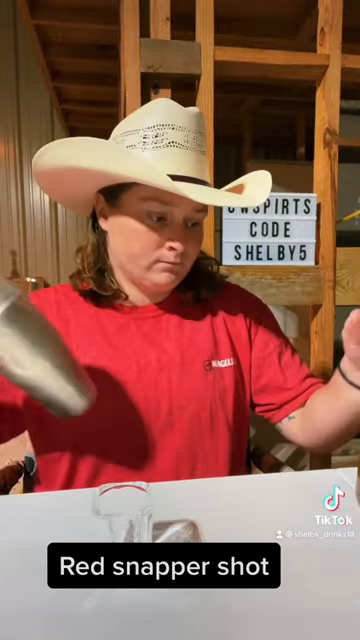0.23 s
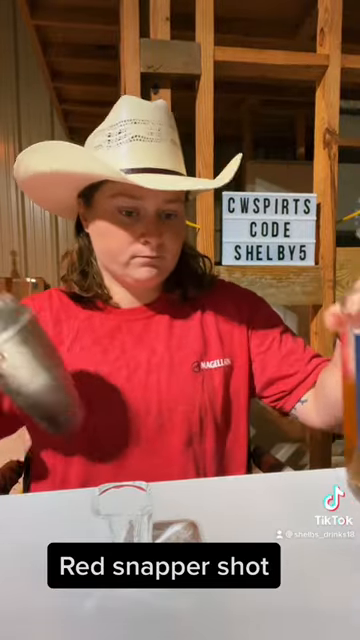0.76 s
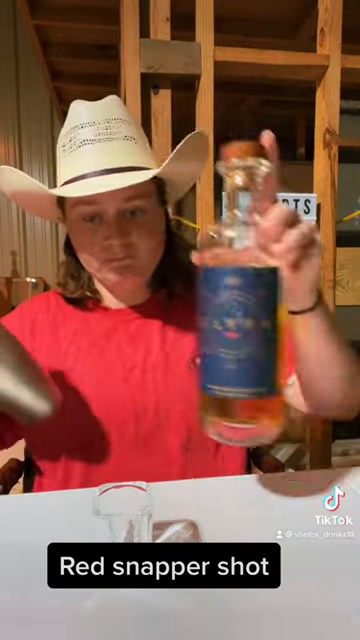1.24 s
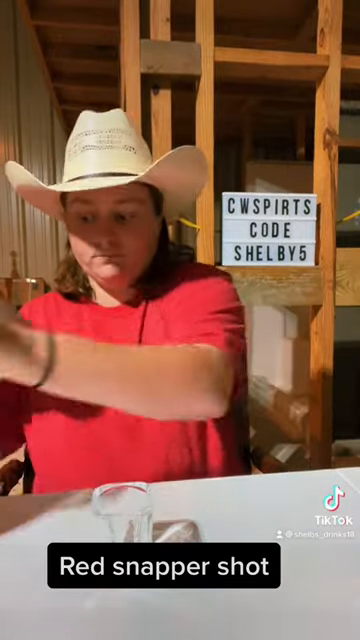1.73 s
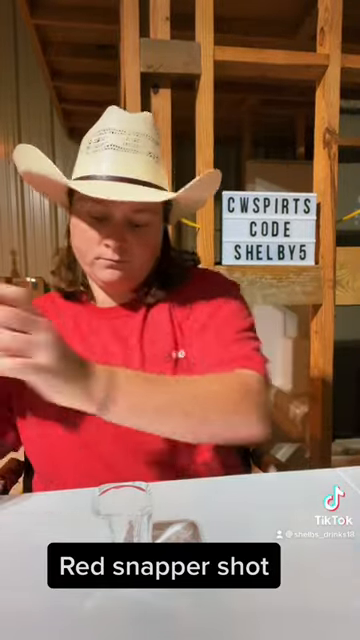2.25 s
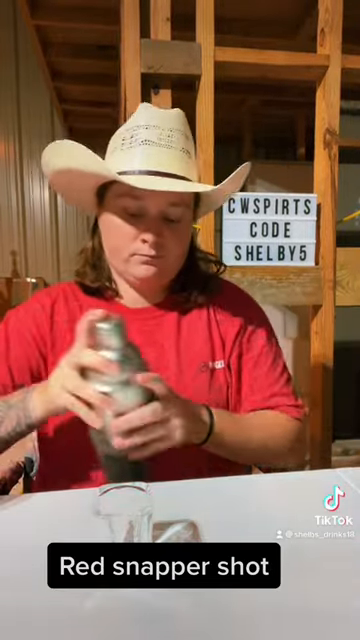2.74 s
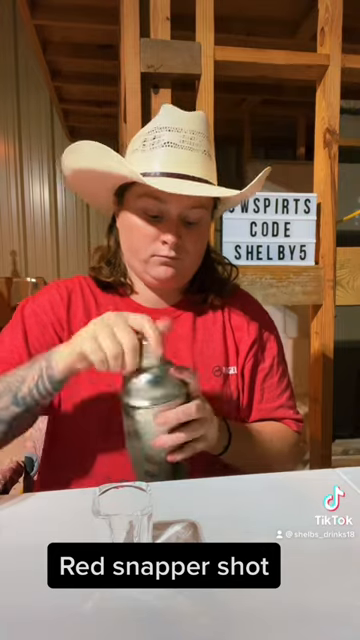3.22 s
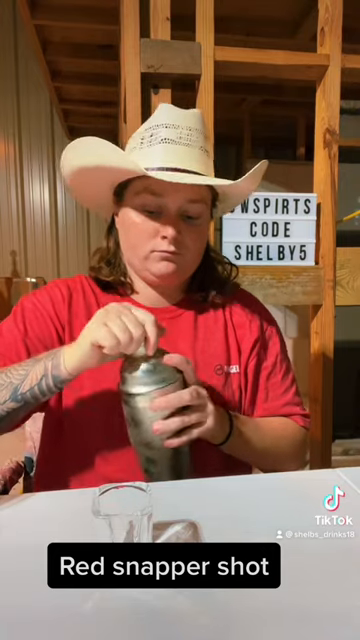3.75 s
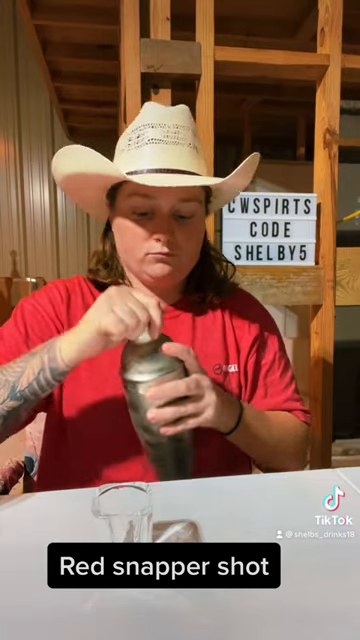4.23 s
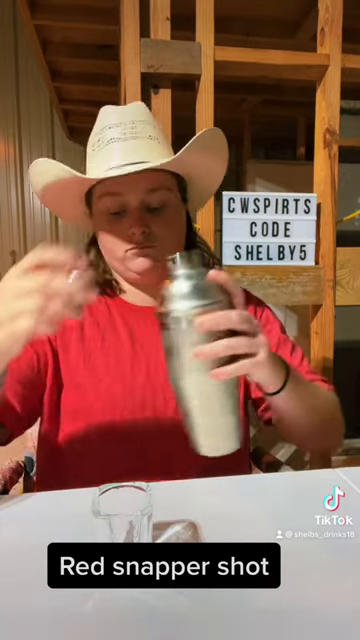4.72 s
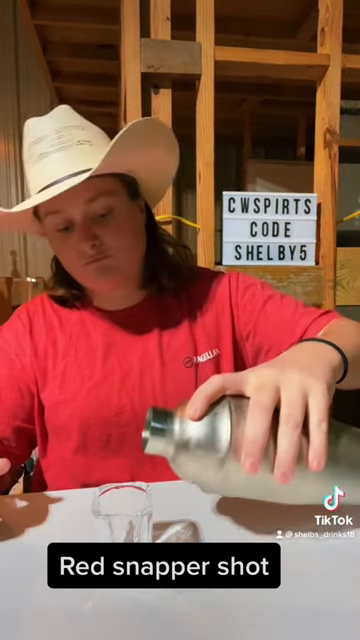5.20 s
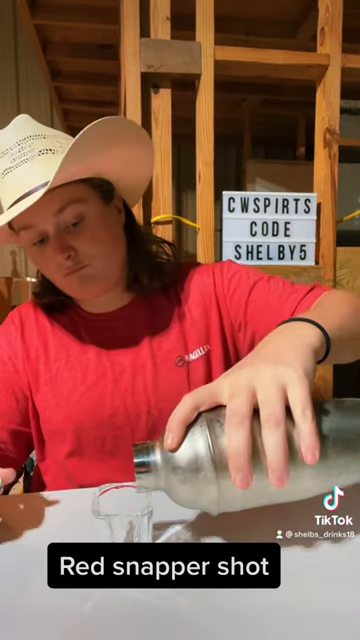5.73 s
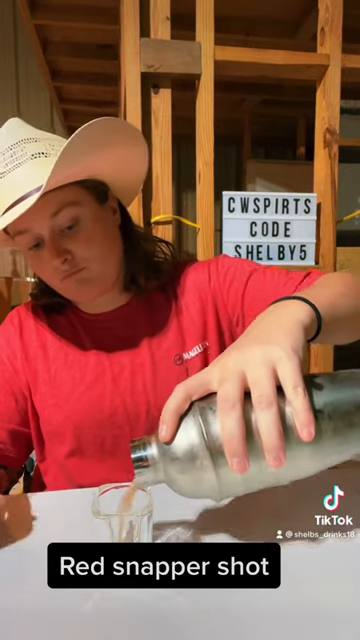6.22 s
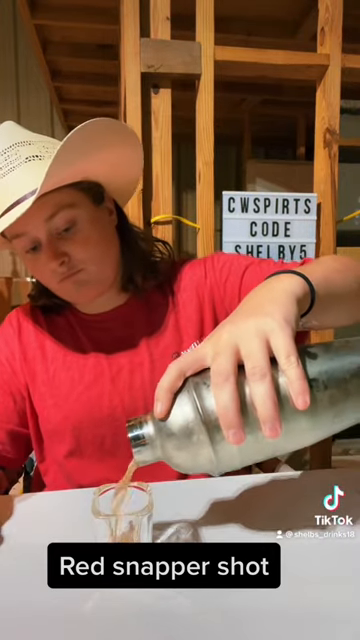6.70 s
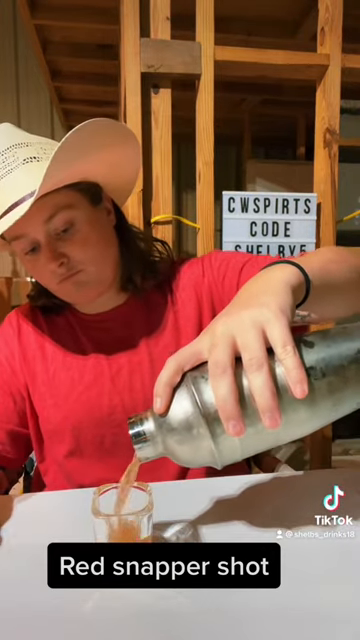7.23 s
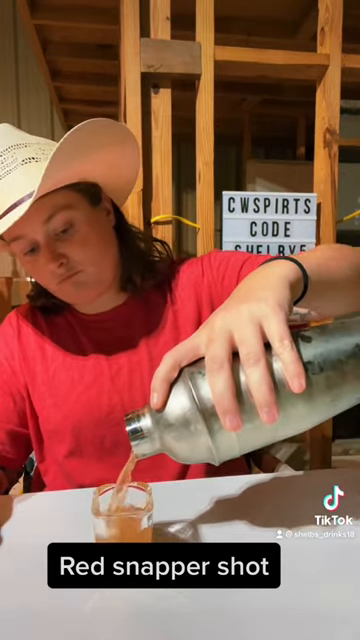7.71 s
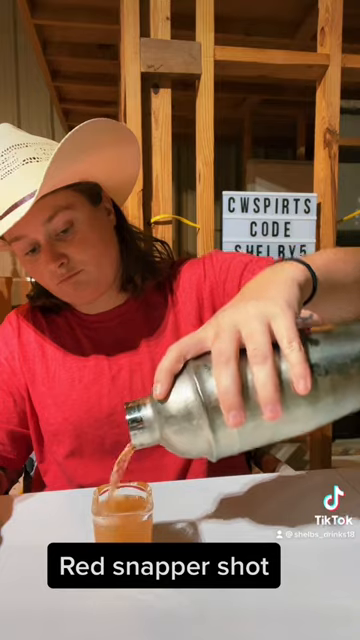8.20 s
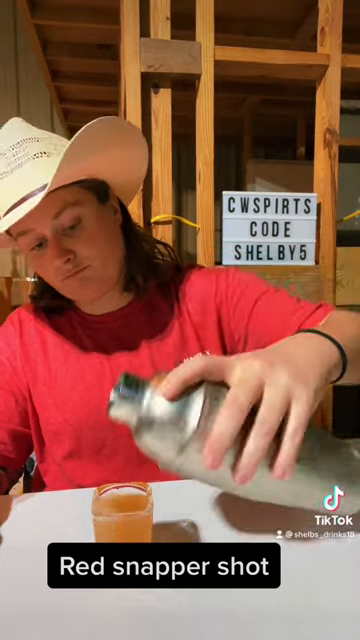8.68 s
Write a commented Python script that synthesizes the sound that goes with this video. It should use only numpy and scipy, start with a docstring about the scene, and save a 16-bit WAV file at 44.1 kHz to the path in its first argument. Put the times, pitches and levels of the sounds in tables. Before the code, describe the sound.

Over a low steady hum, loud metallic ice shaking stops, steel clicks open, drink trickles into a shot glass, and ice slides back.

```python
"""Ice and liquor rattle and slap in a steel shaker over a steady mains hum, in a small wooden room.
A glass bottle is set down with a thump, foam fizzes, and the steel cap is worked off with rubs and clicks.
The shaker tips, a thin stream gurgles into a shot glass, and the ice slides back as it is righted.
Hits and rubs are mostly filtered noise; bubbles and small chips are many short fading tones.
Struck steel and wood ring as fading sine waves, and the hum is a single sine over noise."""
import sys
import numpy as np
from scipy import signal
from scipy.fft import rfft, irfft, next_fast_len
from scipy.io import wavfile

SR = 44100
rng = np.random.default_rng(int(sys.argv[2]) if len(sys.argv) > 2 else 0)


def digitize_waveform(pressure):
    """Quantize a signal to 16-bit integers and store it at the path in sys.argv[1].

    Rows of a 2-D input are taken as channels; values are limited to [-1, 1].
    """
    field = np.atleast_2d(pressure).T
    bounded = np.clip(field, -1, 1)
    quanta = np.round(bounded * 32767).astype(np.int16)
    wavfile.write(sys.argv[1], SR, quanta)


N = 394694
T = np.arange(N) / SR  # time of every sample, s

# Levels below are relative: each sound's function sets its final mix.

# throws of the load against an end of the shaker: start_s, small_ice_db, liquid_db
SHAKE_STROKES = [(0.019, -23, -48), (0.093, -19.5, -25), (0.236, -22.5, -35), (0.336, -20, -30),
                 (0.455, -19, -41.5), (0.581, -21.5, -31), (0.73, -24.5, -38), (0.844, -23, -29),
                 (1.09, -22, -31.5), (1.345, -25.5, -29.5), (1.53, -24.5, -37.5), (1.661, -26, -33),
                 (1.879, -23, -27.5), (2.148, -21.5, -29), (2.29, -22, -38), (2.414, -23, -27),
                 (2.561, -23.5, -41.5), (2.72, -24, -32)]
# the load never quite rests between throws
SHAKE_END_S, CHURN_DB, CHURN_LIQUID_DB = 2.77, -35, -49
# further cubes land around each throw, this far over the small ice
CUBE_DB, CUBE_SCATTER_DB, CUBE_SPREAD_S, CUBE_HZ = 8.5, 1.5, .03, 2340
# single cubes striking the wall, from hard blows to faint touches: start_s, peak_db, colour_hz
SINGLE_CUBES = [(0.0284, -7.5, 3410), (0.201, -5, 2844), (0.2049, -4, 3930), (0.228, -1.5, 3620),
                (0.238, -4.5, 3550), (0.3207, -6, 1620), (0.3346, 0, 2700), (0.4446, -6, 4120),
                (0.4571, -4.5, 3370), (0.4675, -9.5, 3460), (0.4948, -10.5, 3580), (0.5278, -5.5, 1724),
                (0.564, -4.5, 2980), (0.5716, -1, 2540), (0.7197, -9, 1500), (0.7952, -4.5, 3400),
                (0.8261, -7.5, 1840), (0.845, -3, 1560), (0.9516, -5.5, 4820), (1.04, -8, 3210),
                (1.0739, -11, 3300), (1.0892, -8.5, 2970), (1.2453, -7, 2250), (1.2727, -7, 4530),
                (1.3284, -3.5, 3070), (1.4204, -11, 3080), (1.491, -9.5, 4360), (1.511, -5.5, 8260),
                (1.5507, -11.5, 1750), (2.2659, -6, 4770), (2.2777, -9, 4960), (2.2922, 1.5, 5440),
                (2.393, -6, 2080), (2.4214, -9, 1600), (2.52, -4.5, 8150), (2.5364, 0.5, 7590),
                (2.5406, 0.5, 5520), (2.5558, -1, 3460), (2.5953, -5.5, 1895), (2.6683, -4, 2830),
                (2.7147, -5, 2380), (2.7204, -10, 1770), (2.9255, -28.5, 1670), (3.125, -24, 4010),
                (3.177, -27.5, 4070), (3.6315, -31.5, 1660), (8.406, -29.5, 4270), (8.4314, -28, 4100),
                (8.6426, -8, 2250), (8.756, -10, 3060), (8.7797, -13, 4370), (8.8036, -7.5, 4450),
                (8.9194, -15.5, 5110)]
# wet ice squeaking on steel: start_s, level_db, pitch_hz
ICE_SKIDS = [(8.557, -16.5, 2480), (8.583, -20, 2516)]
# dull knocks on the table and in the hand: start_s, peak_db, colour_hz
DULL_KNOCKS = [(0.63, -29.5, 76.6), (1.738, -11.5, 1000), (1.752, -9, 403), (1.759, -9, 94),
               (1.772, -13, 210), (1.789, -18, 450), (1.874, -22, 475), (4.34, -40.5, 198),
               (6.608, -27.5, 402), (8.241, -29.5, 390)]
# ringing notes of the table: pitch_hz, level_db, fade_60db_s
TABLE_NOTES = [(72.5, 3.5, 1.7), (93.7, 11, 0.2), (202, 7.5, .35), (304, 5.5, 0.37)]
BOTTLE_S, BOTTLE_LENGTH_S = 1.8, .34
BOTTLE_HZ, BOTTLE_DB = 1795, -34  # the bottle's thin ring
# handling stirs the foam: start_s, level_db
FOAM_JOLTS = [(2.85, -42), (4.0, -42.5), (4.32, -51), (5.28, -51.5)]
FOAM_END_S, FOAM_DB = 6.0, -58.5  # the foam at rest
CHIP_DB, CHIP_SCATTER_DB, CHIP_HZ = 14.5, 4, 2800  # stray chips tick this far over the foam
# the cap rubs: start_s, length_s, level_db
CAP_TWISTS = [(3.849, .25, -51.5), (4.287, 0.04, -46.5)]
SQUEAK_S, SQUEAK_LENGTH_S, SQUEAK_DB = 4.285, 0.064, -39.5  # the cap squeaks as it lets go
# clicks of the steel cap and strainer, with a few dull nudges of ice: start_s, peak_db, colour_hz
CLICKS_AND_NUDGES = [(3.899, -24.5, 1680), (3.956, -19, 3550), (3.998, -23, 1700), (4.021, -26, 1720),
                     (4.042, -20.5, 1780), (4.062, -24.5, 1806), (4.117, -25, 1670), (4.175, -31, 1790),
                     (4.446, -39.5, 1250), (4.567, -30, 1100), (4.622, -30, 3540), (4.693, -29.5, 3900),
                     (4.949, -32, 1900), (4.9856, -25.5, 1930), (5.017, -29, 1900), (5.285, -25, 7000),
                     (5.291, -10.5, 4560), (5.347, -23.5, 4580), (5.357, -17, 4780), (6.013, -29.5, 2780)]
# ringing notes of the steel shell: pitch_hz, level_db, fade_60db_s
SHELL_NOTES = [(2540, 1, .5), (4300, -2, 0.13), (4646, -13, 0.34), (6632, -13, .4), (8720, -3, 0.76)]
SWILL_S, SWILL_LENGTH_S, SWILL_DB = 4.42, .7, -57  # the drink swills as the shaker is lifted
TIP_S, TIP_LENGTH_S, LAP_DB = 5.0, .95, -59.5  # liquid laps at the neck while the shaker tips
NECK_HZ, NECK_FULL_HZ, NECK_SINK_S = 1260, 838, 0.23  # its note sinks as the neck fills
# the liquid reaches the strainer: start_s, level_db
STRAINER_SURGE = [(5.16, -47.5)]
# the ice slides back and lands: start_s, level_db
ICE_SLIDES = [(8.65, -30), (8.765, -22)]
# drops that trap a bubble: start_s, level_db, bubble_hz
BUBBLE_DROPS = [(6.331, -27.5, 1460), (6.407, -29.5, 1445), (6.419, -35, 1300), (6.447, -31.5, 1440),
                (6.49, -30, 1282), (6.51, -32, 1440), (6.525, -35, 1490), (6.805, -27.5, 1480),
                (6.928, -29, 1540), (7.34, -31, 1297), (7.374, -35, 2100), (7.396, -24, 2210),
                (7.628, -38, 1250)]
# drops bursting: start_s, level_db, colour_hz
BURSTING_DROPS = [(6.784, -30, 3190), (7.012, -34.5, 4450), (7.115, -34.5, 6500), (7.3256, -28, 7160),
                  (7.3987, -30.5, 2515), (7.441, -29.5, 2560), (7.6243, -32, 2400), (7.8514, -35.5, 2660),
                  (7.911, -39, 3000), (8.089, -41.5, 6060)]
# the thin, dwindling stream
POUR_S, POUR_LENGTH_S, STREAM_DB, STREAM_FADE_DB_PER_S = 6.72, 1.6, -54.5, 5
COLUMN_HZ, COLUMN_RISE_HZ_PER_S = 1496, 970  # the air column shortens as the glass fills
# the gurgle sinks with the root of the depth, which doubles in this time at first
GURGLE_HZ, GURGLE_DEPTH_S = 1293, 0.12
# the stream comes in gushes: start_s, bubbles_db, spray_db, gurgle_db
POUR_GUSHES = [(6.79, -44, -51.5, -51.5), (6.93, -37.5, -61, -51), (7.125, -44, -47.5, -59),
               (7.335, -44, -52.5, -47.5), (7.43, -54, -48, -48), (7.625, -41, -50.5, -52),
               (7.76, -50, -56, -54), (7.92, -54, -59, -55.5), (8.23, -69.5, -55, -59.5)]
GULP_S, GULP_LENGTH_S, GULP_DB = 7.84, 0.15, -47  # low gulps as the shaker runs dry

# colour of ice and clicks on the shaker wall: pitch_hz, level_db_per_hz
SHELL_COLOUR = [(200, -27.5), (900, -12), (1350, -5.5), (1560, 3.5), (1930, -0.5), (2600, -2), (3350, 0),
                (4500, -4), (7600, -6.5), (8500, -9), (9500, -14.5), (11500, -22), (15500, -19)]
# colour of sloshing liquid: pitch_hz, level_db_per_hz
SLOSH_COLOUR = [(120, -11.5), (250, -13), (400, -7.5), (500, -0.5), (590, 0), (680, -7), (830, 3),
                (1050, -8), (1500, -3), (3000, -8.5), (8000, -56.5)]
# colour of fizzing foam: pitch_hz, level_db_per_hz
FOAM_COLOUR = [(200, -4), (500, 3.5), (950, 0.5), (1450, 0), (1750, 11.5), (2000, -2), (2200, 6.5),
               (2450, -4), (4400, -1), (5300, -8.5), (7500, -15), (11000, -32), (16000, -41)]
# colour of ice sliding in the open shaker: pitch_hz, level_db_per_hz
OPEN_SHAKER_COLOUR = [(180, -44), (300, -15), (624, -13.5), (1080, -4), (1170, -5), (1640, -7),
                      (1930, -6.5), (2520, -5.5), (3080, 3), (3520, -11), (4300, -1.5), (5430, -15),
                      (6850, -12), (8790, -26.5), (16000, -26)]
# colour of steel rubbing on steel: pitch_hz, level_db_per_hz
RUB_COLOUR = [(180, -75), (300, -2.5), (645, -12), (762, -2.5), (978, -22), (1100, -4), (1460, -11),
              (1720, -1), (3030, -14), (4670, -4.5), (5430, -11), (8090, -9), (10900, -24), (16000, -28)]
# colour of spray and drops: pitch_hz, level_db_per_hz
SPRAY_COLOUR = [(300, -33), (1500, -6.5), (3500, -7.5), (5000, -0.5), (7000, 0), (10000, -8.5),
                (11500, -20.5), (13500, -19), (15500, -5.5)]
# colour of knocks on wood: pitch_hz, level_db_per_hz
WOOD_COLOUR = [(30, -28.5), (70, -2.5), (150, 1), (205, -5), (250, -12.5), (310, -7), (800, -16),
               (2000, -18.5), (8000, -40)]
# colour of the room air: pitch_hz, level_db_per_hz
AIR_COLOUR = [(20, -49.5), (40, -11), (58, 34), (75, -17), (110, -3), (200, -11), (320, -8.5), (700, -22.5),
              (1500, -25.5), (4000, -30), (8000, -41), (11000, -50.5), (16000, -47.5)]
# how long the room's echo lasts: pitch_hz, fade_60db_s
ROOM_FADE = [(80, 0.95), (2000, 0.84), (15000, 0.26)]
# how long the table's rumble lasts: pitch_hz, fade_60db_s
TABLE_FADE = [(60, 1.3), (300, 0.81), (600, 0.39), (2000, 0.38)]
HUM_HZ = 119.95
TOP_HZ = 16000  # the recorder's upper limit


def amp(db):
    """Turn decibels into a multiplier."""
    return 10 ** (np.asarray(db) / 20)


def unit(x):
    """Scale a sound to an average (rms) strength of 1."""
    return x / np.sqrt(np.mean(x ** 2) + 1e-20)


def along(points, hz):
    """Read a (pitch_hz, value) table between its points, on a log pitch axis."""
    f, v = np.transpose(points)
    return np.interp(np.log(hz + 1), np.log(f + 1), v)


def held(start, length, db, attack_s, release_s):
    """A held level as a multiplier; attack and release are the times to move by 20 dB."""
    before = np.maximum(start - T, 0) / attack_s
    after = np.maximum(T - start - length, 0) / release_s
    return amp(db - 20 * np.minimum(before + after, 10))


def swells(rows, attack_s, release_s, axis=1):
    """One swell for each row, its level in column axis, added in power."""
    return np.sqrt(sum(held(row[0], 0, row[axis], attack_s, release_s) ** 2 for row in rows))


def wobble(rate):
    """A wandering random curve with rate random points a second, joined by straight lines."""
    count = int(N / SR * rate) + 2
    return np.interp(T, np.arange(count) / rate, rng.standard_normal(count))


def add(track, s, sound):
    """Mix a sound into a track at time s."""
    part = track[max(0, round(s * SR)):][:len(sound)]
    part += sound[:len(part)]


def coloured(x, gain_db):
    """Filter a sound by a dB curve over pitch, with no sound ahead of its cause."""
    size = 2048
    log_gain = np.log(amp(gain_db(np.fft.rfftfreq(size, 1 / SR))) + 1e-6)
    cepstrum = irfft(log_gain)
    # folding the second half onto the first makes the filter respond as early as it can
    cepstrum[1:size // 2] *= 2
    cepstrum[size // 2 + 1:] = 0
    response = irfft(np.exp(rfft(cepstrum)))
    return signal.oaconvolve(x, response)[:len(x)]


def shaped(x, spectrum):
    """Filter x by a colour table and scale it to rms 1."""
    return unit(coloured(x, lambda hz: along(spectrum, hz)))


def bump(hz, centre, octaves):
    """A bell of height 1 on a log pitch axis."""
    return np.exp(-.5 * (np.log2((hz + 1) / centre) / octaves) ** 2)


def diffuse(x, decays):
    """A dense echo from walls or boards: noise in which each pitch dies at its own speed."""
    hz, t, z = signal.stft(rng.standard_normal(SR), SR, nperseg=512)
    fading = z * amp(-60 * t / along(decays, hz)[:, None])
    tail = signal.istft(fading, SR, nperseg=512)[1]
    tail = np.pad(tail / np.linalg.norm(tail), (SR // 200, 0))  # starts 5 ms late
    return signal.oaconvolve(x, tail)[:N]


def ring(modes, centre):
    """Fading sine notes of random strength; those near the colour of the blow ring most."""
    t = T[:SR]
    scatter_db, focus_db = 1.5, 14
    out = np.zeros(SR)
    for hz, db, t60 in modes:
        focus = focus_db * (bump(hz, centre, octaves=0.27) - 1)
        strength_db = db + rng.normal(0, scatter_db) + focus
        out += amp(strength_db - 60 * t / t60) * np.sin(2 * np.pi * hz * t)
    return out


def grains(gain, rate, pitch, cycles, spread_db, glide=0):
    """Random fading pings where gain is audible, rms 1 there; pitch(s, u) turns a random u into Hz."""
    start, end = T[gain > gain.max() / 100][[0, -1]]
    draws = np.random.default_rng(rng.integers(2 ** 32)).random((int(rate * (end - start)), 3))
    when, u, size = draws.T
    s = start + when * (end - start)
    hz = pitch(s, u)[:, None]
    turns = hz * T[:700]
    strength = amp(-spread_db * np.log(.02 + size))[:, None] * hz
    bent_turns = turns * (1 + glide * turns / cycles)  # a positive glide lifts the pitch
    pings = strength * np.exp(-turns / cycles) * np.sin(2 * np.pi * bent_turns)
    pings *= np.cos(np.linspace(0, np.pi / 2, turns.shape[1]))  # end each ping in silence
    at = (s * SR).astype(int)[:, None] + np.arange(turns.shape[1])
    x = np.bincount(at.ravel().clip(0), pings.ravel(), N)[:N]
    return unit(x) * np.sqrt((end - start) * SR / N)


def any_pitch(low_hz, high_hz):
    """Pitches spread evenly over the octaves of a range."""
    return lambda s, u: low_hz * (high_hz / low_hz) ** u


def gliding(hz, octaves):
    """Pitches scattered round a moving note, given in Hz for every sample."""
    return lambda s, u: np.interp(s, T, hz) * 2 ** (octaves * (u - .5))


def contact(centre, body, t60, rattle_db, rattle_t60, focus_db, octaves):
    """One hit of peak 1: a noise crack and a weaker rattle, coloured by the body and the striker."""
    t = T[:SR // 8]
    fade = amp(-60 * t / t60) + amp(rattle_db - 60 * t / rattle_t60)
    burst = rng.standard_normal(len(t)) * fade
    x = coloured(burst, lambda hz: along(body, hz) + focus_db * bump(hz, centre, octaves))
    return x / np.abs(x).max()


def background():
    """Hum at twice the mains frequency, a sine, over a soft noise rumble of room air."""
    hum = np.sin(2 * np.pi * HUM_HZ * T)
    air = shaped(rng.standard_normal(N), AIR_COLOUR)
    return amp(-31.0) * hum + amp(-47) * air


def shaking():
    """Chips of ice rattle in the froth, and the liquor slaps from end to end at each stroke."""
    churn = held(0, SHAKE_END_S, 0, attack_s=.1, release_s=.18)
    ice_throws = swells(SHAKE_STROKES, attack_s=0.099, release_s=.14, axis=1)
    rattle = np.hypot(ice_throws, amp(CHURN_DB) * churn)
    liquid_throws = swells(SHAKE_STROKES, attack_s=0.046, release_s=.09, axis=2)
    slap = np.hypot(liquid_throws, amp(CHURN_LIQUID_DB) * churn)
    chips = shaped(grains(rattle, 1100, any_pitch(907, 14100), cycles=2.5, spread_db=3.5), SHELL_COLOUR)
    froth = shaped(rng.standard_normal(N), SHELL_COLOUR) * amp(2.9 * wobble(150))
    liquid = shaped(grains(slap, 1800, any_pitch(267, 2190), cycles=1.23, spread_db=5.0), SLOSH_COLOUR)
    clumps = unit(amp(2.3 * wobble(70)))  # uneven bunches of rattle
    ice = rattle * clumps * (amp(-8.0) * chips + amp(-9.5) * froth)
    return ice + amp(-5.5) * slap * liquid


def cube(hz):
    """Ice on the wall: bright corner hits are over at once; dull ones set the whole load rattling."""
    dull = np.log2(3000 / hz)
    crack_t60, rattle_db = .0095 * 1.2 ** dull, -19 + 3 * dull
    focus_db = 8 - 2.7 * dull
    return contact(hz, SHELL_COLOUR, crack_t60, rattle_db, rattle_t60=0.13, focus_db=focus_db, octaves=0.31)


def ice_hits():
    """Single cubes strike the wall, with four more around every throw; wet ones squeak unsteadily."""
    out, t = np.zeros(N), T[:SR // 16]
    for s, db, hz in SINGLE_CUBES:
        add(out, s, amp(db) * cube(hz))
    for s, db, _ in SHAKE_STROKES:
        for late, strong, bright in rng.standard_normal(size=(4, 3)):
            level_db = db + CUBE_DB + CUBE_SCATTER_DB * strong
            add(out, abs(s + CUBE_SPREAD_S * late), amp(level_db) * cube(CUBE_HZ * 2 ** (bright / 2)))
    for s, db, hz in ICE_SKIDS:
        phase = 2 * np.pi * hz * t + 0.069 * np.cumsum(rng.standard_normal(len(t)))
        squeak = np.sin(phase) + 0.46 * np.sin(1.55 * phase) + .5 * np.sin(2.6 * phase)
        squeak += 0.13 * rng.standard_normal(len(t))
        add(out, s, amp(db - 7.5) * squeak * (t / 0.0015) * np.exp(1 - t / 0.003))
    return out


def knocks():
    """Dull blows rumble through the table; the bottle keeps a thin, wavering ring."""
    blows, boom = np.zeros((2, N))
    for s, db, hz in DULL_KNOCKS:
        thump = contact(hz, WOOD_COLOUR, t60=0.058, rattle_db=-23.0, rattle_t60=0.087,
                        focus_db=8.5, octaves=0.75)
        add(blows, s, amp(db) * thump)
        # blows with a higher colour stir the table's low notes less
        add(boom, s, amp(db - 10.5) * min(1, 110 / hz) * ring(TABLE_NOTES, hz))
    bottle_level = held(BOTTLE_S, BOTTLE_LENGTH_S, BOTTLE_DB, attack_s=.03, release_s=.1)
    bottle = bottle_level * np.sin(2 * np.pi * BOTTLE_HZ * T) * amp(2 * wobble(20))
    return blows + amp(-2) * diffuse(blows, TABLE_FADE) + boom + bottle


def settling():
    """Foam fizzes as noise and ticks as pings, more at every jolt; stray chips touch the wall."""
    rest = held(SHAKE_END_S, FOAM_END_S - SHAKE_END_S, FOAM_DB, attack_s=0.081, release_s=0.6)
    stir = np.hypot(swells(FOAM_JOLTS, attack_s=.16, release_s=.5), rest)
    fizz = shaped(rng.standard_normal(N), FOAM_COLOUR) * amp(1.5 * wobble(40))
    ticks = shaped(grains(stir, 110, any_pitch(1500, 7000), cycles=.8, spread_db=2.5), FOAM_COLOUR)
    out = stir * (amp(-4) * fizz + amp(-0.5) * ticks)
    for when, strong, bright in rng.uniform(-1, 1, size=(22, 3)):
        s = np.interp(when, [-1, 1], [SHAKE_END_S, FOAM_END_S])
        chip = contact(CHIP_HZ * 2 ** bright, SHELL_COLOUR, t60=0.019, rattle_db=-11, rattle_t60=.04,
                       focus_db=3, octaves=1.0)
        add(out, s, np.interp(s, T, stir) * amp(CHIP_DB + CHIP_SCATTER_DB * strong) * chip)
    return out


def cap():
    """Steel rubs and squeaks on steel as the cap comes off; clicks and ice nudges ring the shell."""
    rubbing = sum(held(s, length, db, attack_s=.025, release_s=0.039) for s, length, db in CAP_TWISTS)
    scratches = shaped(grains(rubbing, 350, any_pitch(560, 2730), cycles=1.7, spread_db=5.5), RUB_COLOUR)
    scrape = shaped(rng.standard_normal(N), RUB_COLOUR) * amp(4.5 * wobble(180))
    out = rubbing * (scrape + amp(-5.5) * scratches)
    # the squeak is noise with one pitch region raised
    squeak = unit(coloured(rng.standard_normal(N), lambda hz: 30 * bump(hz, 4700, octaves=.22)))
    out += held(SQUEAK_S, SQUEAK_LENGTH_S, SQUEAK_DB, attack_s=.016, release_s=.01) * squeak
    hardest_db = max(db for _, db, _ in CLICKS_AND_NUDGES)
    for s, db, hz in CLICKS_AND_NUDGES:
        touch = contact(hz, SHELL_COLOUR, t60=0.0098, rattle_db=-25.5, rattle_t60=0.11,
                        focus_db=7.5, octaves=.7)
        add(out, s, amp(db) * touch)
        # the hand damps the ring of light touches, so they ring more weakly than hard ones
        ring_db = db - 28.5 - 0.45 * (hardest_db - db)
        add(out, s, amp(ring_db) * ring(SHELL_NOTES, hz))
    return out


def tilting():
    """Liquid swills, then laps at the neck as bubbly pings; the ice slides back when righted."""
    tipping = held(TIP_S, TIP_LENGTH_S, LAP_DB, attack_s=.1, release_s=.2)
    lapping = np.hypot(tipping, swells(STRAINER_SURGE, attack_s=.12, release_s=.55))
    sink = np.exp(-np.maximum(T - TIP_S, 0) / NECK_SINK_S)
    neck_hz = NECK_FULL_HZ + (NECK_HZ - NECK_FULL_HZ) * sink
    lap = grains(lapping, 130, gliding(neck_hz, octaves=0.17), cycles=4.1, spread_db=5.5)
    sliding = swells(ICE_SLIDES, attack_s=.14, release_s=0.21)
    sliding = sliding + held(8.37, 0.47, -52, attack_s=.08, release_s=.1)
    slide = shaped(grains(sliding, 2200, any_pitch(600, 14000), cycles=4, spread_db=3.5), OPEN_SHAKER_COLOUR)
    swilling = held(SWILL_S, SWILL_LENGTH_S, SWILL_DB, attack_s=.1, release_s=.3)
    swill = grains(swilling, 110, any_pitch(770, 1480), cycles=3, spread_db=4, glide=.01)
    return amp(0.5) * lapping * lap + swilling * swill + amp(-15) * sliding * slide


def drops():
    """A drop ticks on the surface as its bubble's note climbs and fades; others just burst."""
    out, t = np.zeros(N), T[:SR // 20]
    for s, db, hz in BUBBLE_DROPS:
        tick = contact(hz, SPRAY_COLOUR, t60=.005, rattle_db=-20, rattle_t60=.03, focus_db=24, octaves=.7)
        add(out, s, amp(db - 8) * tick)
        bubble = np.sin(2 * np.pi * hz * t * (1 + 6 * t))
        bubble_level = amp(-60 * t / 0.02) * (1 - np.exp(-t / 0.00039))
        add(out, s, amp(db) * bubble * bubble_level)
    for s, db, hz in BURSTING_DROPS:
        burst = contact(hz, SPRAY_COLOUR, t60=0.0079, rattle_db=-7.5, rattle_t60=0.043,
                        focus_db=14.5, octaves=0.37)
        add(out, s, amp(db + 1.5) * burst)
    return out


def pouring():
    """The stream gushes: bubbles sound the shrinking air column while the gurgle sinks."""
    age = np.maximum(T - POUR_S, 0)
    stream_db = STREAM_DB - STREAM_FADE_DB_PER_S * age
    stream = held(POUR_S, POUR_LENGTH_S, stream_db, attack_s=.08, release_s=.1)

    def gushing(axis, stream_gain_db):
        """Gushes from one table column over the steady stream."""
        gushes = swells(POUR_GUSHES, attack_s=.07, release_s=.12, axis=axis)
        return np.hypot(gushes, amp(stream_gain_db) * stream)

    bubbling, spraying, gurgling = gushing(1, 1.5), gushing(2, -0.5), gushing(3, -1.5)
    column_hz = COLUMN_HZ + COLUMN_RISE_HZ_PER_S * age
    gurgle_hz = GURGLE_HZ / np.sqrt(1 + age / GURGLE_DEPTH_S)
    column = grains(bubbling, 170, gliding(column_hz, octaves=0.33), cycles=3.7, spread_db=5, glide=.008)
    froth = grains(bubbling, 130, any_pitch(960, 1730), cycles=5.0, spread_db=4.0, glide=0.022)
    gurgle = grains(gurgling, 200, gliding(gurgle_hz, octaves=.3), cycles=3.5, spread_db=3, glide=.008)
    spray = shaped(grains(spraying, 200, any_pitch(2500, 16000), cycles=1.5, spread_db=4.5), SPRAY_COLOUR)
    bubbling = bubbling * unit(amp(2.5 * wobble(25)))  # uneven flow of bubbles
    bubbles = bubbling * (amp(-7) * column + amp(-6.5) * froth)
    return bubbles + amp(-10.0) * spraying * spray + amp(1) * gurgling * gurgle


def gulps():
    """Big, low bubbles near the end of the pour, made of low pings that glide upward."""
    gulping = held(GULP_S, GULP_LENGTH_S, GULP_DB, attack_s=0.035, release_s=0.085)
    return gulping * grains(gulping, 150, any_pitch(197, 380), cycles=3.0, spread_db=5.0, glide=.02)


def scene():
    """All sources together; the ice, drink and steel also get a little echo of the timber room."""
    hum_and_air = background()
    drink = shaking() + ice_hits() + settling() + cap() + tilting() + drops() + pouring() + gulps()
    echo = amp(-14.5) * diffuse(drink, ROOM_FADE)
    return (drink + echo + knocks() + hum_and_air)[None]


def record(dry):
    """The deepest rumble below 42 Hz is cleared away; the recorder rounds off the tallest peaks and cuts the
    very top."""
    rumble_cut = signal.butter(4, 42, "highpass", fs=SR, output="sos")
    dry = signal.sosfilt(rumble_cut, dry)
    rounded = dry / (1 + (dry / .85) ** 6) ** (1 / 6)
    size = next_fast_len(N + SR // 4)
    kept = np.fft.rfftfreq(size, 1 / SR) < TOP_HZ
    return irfft(rfft(rounded, size) * kept, size)[:, :N]


dry = scene()
out = record(dry)
digitize_waveform(out)
```